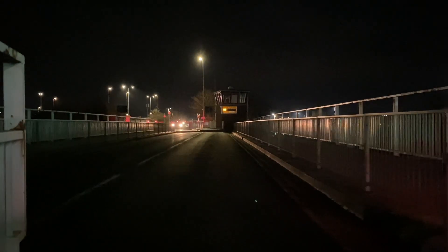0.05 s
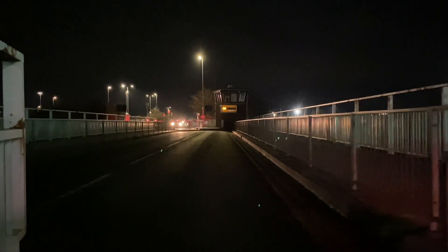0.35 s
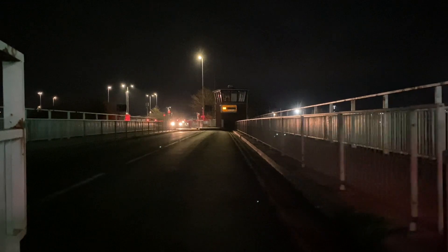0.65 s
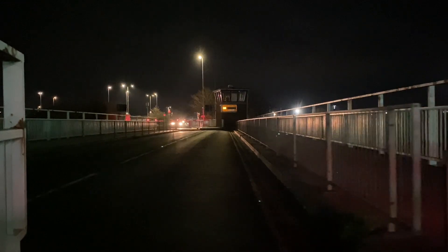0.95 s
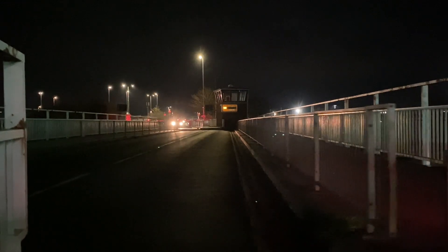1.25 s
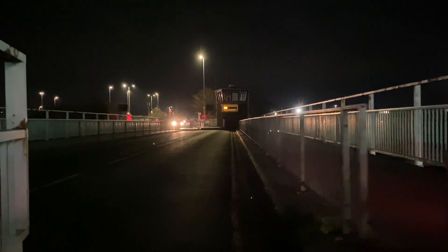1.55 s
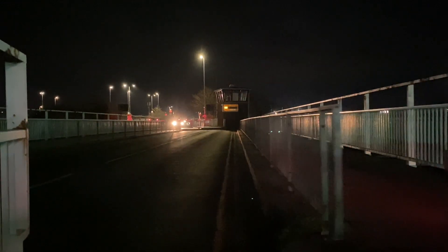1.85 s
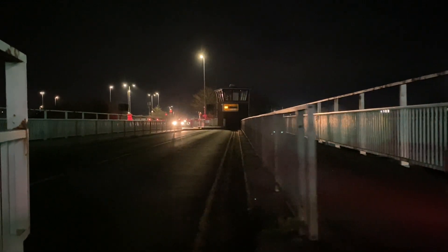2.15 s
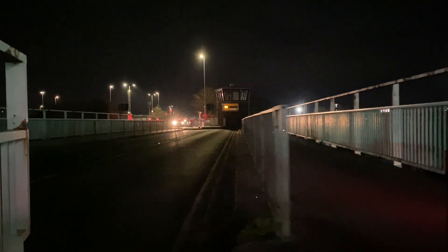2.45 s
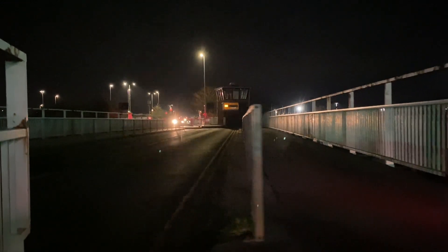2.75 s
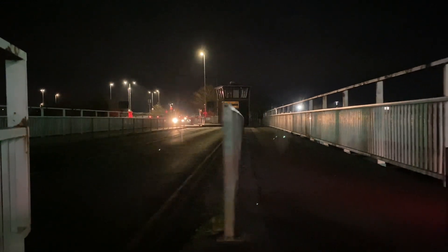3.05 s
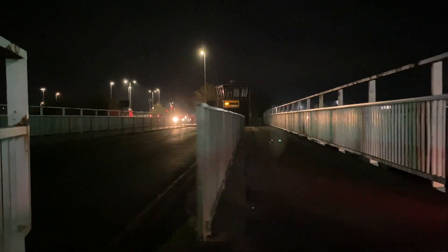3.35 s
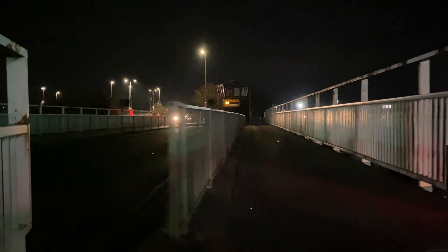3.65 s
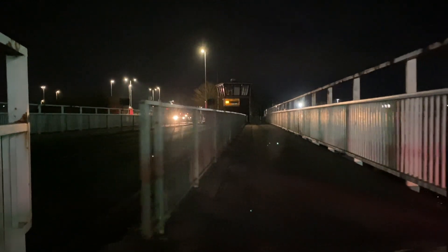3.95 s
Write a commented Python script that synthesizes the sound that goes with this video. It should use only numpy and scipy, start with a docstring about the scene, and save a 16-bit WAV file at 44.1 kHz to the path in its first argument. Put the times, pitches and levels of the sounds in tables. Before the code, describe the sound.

An engine runs low over a thudding rumble, whirring machinery and distant traffic. Metal rasps with a thin ring at 0.7 seconds, then the engine revs, peaking near 1.3 and sinking by 2.5. A second rasp at 2.8 precedes a louder rev that peaks around 3.4 and runs down. Small ticks gather from 3.6, with one dull knock close by at about 3.9 seconds.

```python
"""On a steel swing bridge at night, as it turns. An engine revs up twice and runs down, its exhaust
booming at multiples of the firing rate over a thudding rumble, humming and whirring gear and far traffic.
Metal rasps twice as quick slips excite its resonances, the first time with a thin ring, and friction
gives two faint squeaks. Small contacts tick, mostly towards the end, where one dull knock sounds
close to the microphone; both ring briefly in damped modes."""
import sys
import numpy as np
from scipy import signal
from scipy.io import wavfile

SR = 44100
rng = np.random.default_rng(int(sys.argv[2]) if len(sys.argv) > 2 else 0)


def digitize_waveform(pressure):
    """Quantize a signal to 16-bit integers and store it at the path in sys.argv[1].

    Rows of a 2-D input are taken as channels; values are limited to [-1, 1].
    """
    field = np.atleast_2d(pressure).T
    bounded = np.clip(field, -1, 1)
    quanta = np.round(bounded * 32767).astype(np.int16)
    wavfile.write(sys.argv[1], SR, quanta)


N = 176400
T = np.arange(N) / SR

# coherence of the noise at the two microphones: (frequency [Hz], correlation [-])
COHERENCE = [(30, 1), (70, 0.88), (160, 1), (350, 0.94), (700, 0.39), (1400, 0.1), (2800, 0.24),
             (5500, 0.18), (9000, 0.92)]

# engine speed through the two revs: (time [s], firing rate [Hz])
FIRING_RATE = [(0, 40.06), (.85, 41.87), (.95, 54.2), (1.03, 67.1), (1.12, 78.06), (1.25, 90.95),
               (1.45, 84.2), (1.62, 77.95), (1.8, 70.96), (2.1, 55.26), (2.45, 43.62), (2.9, 43.8),
               (3.02, 52.9), (3.12, 62.06), (3.2, 71.93), (3.33, 81.8), (3.43, 84.7), (3.58, 78.6),
               (3.8, 70.13), (4, 65.04)]
# exhaust fundamental: (time [s], level [dB])
BOOM_LEVEL = [(0, -59), (.95, -57.5), (1.08, -36.5), (1.17, -33.5), (1.3, -51.5), (1.47, -42), (1.66, -38),
              (1.81, -27.5), (1.88, -40), (2.15, -54.5), (3.05, -52.5), (3.17, -26), (3.33, -29),
              (3.53, -35.5), (3.72, -29.5), (3.8, -30.5), (4, -27.5)]
# third exhaust order: (time [s], level [dB])
THIRD_ORDER_LEVEL = [(0, -71), (.8, -69), (1.05, -52.5), (1.4, -60), (1.66, -50), (1.83, -53.5),
                     (1.94, -45.5), (2.05, -52), (2.2, -62), (2.86, -64), (3.03, -41.5), (3.25, -43),
                     (3.5, -54.5), (3.8, -55.5), (4, -40)]
# envelope of the orders around the octave, strongest under throttle: (time [s], level [dB])
OVERTONE_LEVEL = [(0, -70), (.8, -55.5), (1.03, -36.5), (1.19, -37), (1.32, -54), (1.53, -44.5),
                  (1.7, -44.5), (1.85, -49.5), (2.06, -44.5), (2.2, -55), (2.86, -51), (3.02, -32),
                  (3.17, -29), (3.28, -30), (3.42, -38), (3.549, -50), (3.8, -46), (4, -37.5)]
# orders under that envelope: (multiple of the firing rate [-], relative level [dB])
OVERTONES = [(1.5, -11), (2, -1), (2.5, -16)]

# rumble envelope: (time [s], level [dB])
RUMBLE_LEVEL = [(0, -48.5), (.22, -45), (.47, -44.5), (.56, -47), (.8, -47), (.92, -38.5), (1.14, -39.5),
                (1.32, -43.5), (1.6, -43.5), (1.87, -44), (1.97, -39.5), (2.06, -35), (2.16, -44),
                (2.38, -43), (2.56, -38), (2.68, -45), (2.88, -42), (3.04, -32), (3.2, -36), (3.5, -37),
                (4, -34.5)]
# rumble spectrum: (frequency [Hz], relative density [dB])
RUMBLE_SPECTRUM = [(20, -29), (33, -18.5), (48, -2.5), (72, 4.5), (98, -4.5), (125, -0.5), (165, -6),
                   (210, -5.5), (270, -19), (450, -33)]
# road and machinery envelope: (time [s], level [dB])
ROAR_LEVEL = [(0, -53), (.15, -53), (.3, -54), (.82, -52.5), (1.02, -47.5), (1.4, -48.5), (2.0, -50),
              (2.25, -52), (2.85, -51.5), (3.2, -46), (3.45, -47.5), (3.65, -48), (4, -48)]
# road and machinery spectrum: (frequency [Hz], relative density [dB])
ROAR_SPECTRUM = [(150, -3.5), (270, -4.5), (340, -3.5), (440, 2.5), (550, -7), (720, -4.5), (900, -11),
                 (1100, -17), (1350, -12), (1650, -22.5), (2100, -19.5), (2750, -29), (3500, -36),
                 (5000, -44.5), (7500, -46), (9200, -61.5), (12000, -44.5), (14000, -67)]
# tyre noise envelope: (time [s], level [dB])
HISS_LEVEL = [(0, -73.5), (.85, -77.5), (1.15, -68), (1.7, -69.5), (2.2, -72), (2.85, -76), (3.2, -76),
              (4, -74.5)]
# tyre noise spectrum: (frequency [Hz], relative density [dB])
HISS_SPECTRUM = [(1200, -1.5), (1800, 0.5), (2600, 3), (3300, -12.5), (4900, -17.5), (6200, -14.5),
                 (7800, -20.5), (9000, -34)]
# machinery tones: (frequency [Hz], level [dB])
HUM_TONES = [(115, -58), (195, -59.5), (315, -62), (774, -69.5)]
# resonances of the turning gear: (frequency [Hz], bandwidth [Hz], initial level [dB])
GEAR_MODES = [(647, 51, -57.5), (960, 82, -63.5), (1262, 41, -74.5)]

# light contacts: (time [s], ring gain [dB], crack gain [dB])
TICKS = [(.137, -37, -62), (2.572, -38.5, -58), (3.637, -30.5, -57), (3.665, -39.5, -62.5),
         (3.752, -29.5, -46), (3.841, -33, -56), (3.8898, -31.5, -48.5), (3.903, -34.5, -53.5),
         (3.9385, -28.5, -45.5), (3.9427, -18, -45), (3.9825, -28, -48)]
# their resonances: (frequency [Hz], relative level [dB], T60 [s])
TICK_MODES = [(429, -10.5, 0.03), (681, 0.5, .016), (860, -12, 0.013)]
# deep bumps in the rumble: (time [s], gain [dB])
THUDS = [(0.199, -34), (.363, -37.5), (.452, -35.5), (1.918, -28.5), (3.022, -23.5), (3.822, -19)]
# their resonances: (frequency [Hz], relative level [dB], T60 [s])
THUD_MODES = [(68, 1.5, .16), (114, -5, 0.05)]
# slips that make up the two rasps: (time [s], friction level [dB], ring gain [dB])
SLIPS = [(0.7283, -52.5, -55), (0.741, -54.5, -56), (2.8415, -54, -53), (2.849, -51.5, -55),
         (2.858, -56, -54)]
# friction spectrum: (frequency [Hz], relative density [dB])
RASP_SPECTRUM = [(700, -13), (1400, 2), (2700, -7.5), (3700, -17), (5300, -9), (8200, -12), (9500, -24.5),
                 (11500, -20.5), (14000, -38.5)]
# rubbed metal: (frequency [Hz], bandwidth [Hz], gain in first rasp [dB], gain in second rasp [dB])
METAL_MODES = [(1267, 90, -2.5, -6), (1484, 90, -7, -5), (1895, 120, -7, -6.5), (2670, 260, -23, -6.5),
               (3115, 130, -8.5, -17.5), (4040, 120, -17.5, -17), (5460, 320, -12.5, -15.5)]
# friction squeaks: (time [s], level [dB])
SQUEAKS = [(2.083, -79.5), (2.186, -73.5)]
# resonances of the close knock: (frequency [Hz], relative level [dB], T60 [s])
KNOCK_MODES = [(71.5, 4, 0.11), (126, -1.5, 0.06), (230, 0.5, 0.031), (334, -4, 0.021), (712, -3, 0.016)]

RUMBLE_LAG_S = .00029   # rumble and thuds reach the left microphone first
CUTOFF_HZ = 13700


def from_db(db):
    """Amplitude grows tenfold for every 20 dB."""
    return np.exp(np.asarray(db) * np.log(10) / 20)


def rms_one(x):
    """Normalisation to unit mean power."""
    return x / np.sqrt(np.mean(x ** 2) + 1e-20)


def in_time(curve):
    """Linear interpolation of a curve at every sample."""
    return np.interp(T, *np.transpose(curve))


def at_hz(spectrum, hz):
    """Interpolation on a logarithmic frequency axis."""
    frequencies, values = np.transpose(spectrum)
    return np.interp(np.log(hz), np.log(frequencies), values)


def drift(rate_hz):
    """Low-passed noise gives a slow random modulation of rms 1."""
    step, settle = 40, 2000   # samples per control point; control points for the filter to settle
    pole = np.exp(-2 * np.pi * rate_hz * step / SR)
    white = rng.standard_normal(N // step + settle + 2)
    slow = signal.lfilter([1], [1, -2 * pole, pole * pole], white)[settle:]
    return np.interp(np.arange(N) / step, np.arange(len(slow)), rms_one(slow))


def band(x, low_hz, high_hz, order=2):
    """Butterworth band-pass filtering."""
    return signal.sosfilt(signal.butter(order, [low_hz, high_hz], "band", fs=SR, output="sos"), x)


def resonance(hz, width_hz, shape=N):
    """A randomly driven resonance yields narrow-band noise; rms 1."""
    return rms_one(band(rng.standard_normal(shape), hz - width_hz / 2, hz + width_hz / 2))


def pan(db):
    """Direction by level difference: positive favours the left."""
    return from_db(np.array([[db], [-db]]) / 2)


def lagged(x, lag_s):
    """Direction by arrival time: a positive lag delays the right channel, a negative one advances it."""
    left, right = np.broadcast_to(x, (2, N))
    return np.array([left, np.interp(T - lag_s, T, right)])


def noise(spectrum, flicker_db, flicker_hz):
    """Partly coherent stereo noise in independently modulated third-octave bands; rms 1."""
    edges = 22 * 2 ** (np.arange(29) / 3)
    out, white = 0, rng.standard_normal((2, 2, N + SR // 2))
    for k, (low, high) in enumerate(zip(edges, edges[1:])):
        if high < spectrum[0][0] or low > spectrum[-1][0]:
            continue
        mid, side = band(white[k % 2], low, high, order=3)[:, -N:]
        hz = np.sqrt(low * high)
        alike = at_hz(COHERENCE, hz)
        gain = from_db(at_hz(spectrum, hz) + flicker_db * drift(flicker_hz))
        out = out + gain * (np.sqrt(1 + alike) * mid + np.sqrt(1 - alike) * side * [[1], [-1]])
    return rms_one(out)


def decay(start_s, t60_s):
    """Exponential damping: a fall of 60 dB in each T60."""
    return (T >= start_s) * from_db(-60 * np.maximum(T - start_s, 0) / t60_s)


def swell(peak_s, rise_s, fall_s):
    """Exponential growth to a peak, then exponential decay."""
    return np.exp(np.minimum(T - peak_s, 0) / rise_s - np.maximum(T - peak_s, 0) / fall_s)


def power_sum(envelopes):
    """Incoherent sounds add in power."""
    return np.linalg.norm(envelopes, axis=0)


def struck(start_s, modes):
    """Free vibration after an impact is a sum of damped sinusoids."""
    out, ringing = np.zeros(N), (T >= start_s) & (T < start_s + .5)
    age = T[ringing] - start_s
    for hz, db, t60_s in modes:
        out[ringing] += from_db(db - 60 * age / t60_s) * np.sin(2 * np.pi * hz * age)
    return out


def engine(jitter=.01, flutter_db=1.5):
    """Periodic firing radiates exhaust orders whose pitch rises and falls with engine speed."""
    firing_hz = in_time(FIRING_RATE) * (1 + jitter * drift(15.7))
    phase = 2 * np.pi * np.cumsum(firing_hz) / SR
    orders = [(1, in_time(BOOM_LEVEL)), (3, in_time(THIRD_ORDER_LEVEL))]
    orders += [(order, in_time(OVERTONE_LEVEL) + db) for order, db in OVERTONES]
    exhaust = 0
    for order, db in orders:
        amplitude = np.sqrt(2) * from_db(db + flutter_db * drift(9.6))
        exhaust += amplitude * np.sin(order * phase + 2 * np.pi * rng.random())
    return lagged(exhaust, .00028)


def rumble():
    """Amplitude modulation makes low noise throb; it swells as the engine pulls."""
    envelope = from_db(in_time(RUMBLE_LEVEL) + 1.4 * drift(7.4))
    return lagged(envelope * noise(RUMBLE_SPECTRUM, flicker_db=2.5, flicker_hz=9), RUMBLE_LAG_S)


def roar():
    """Traffic and machinery superpose into a wide wash of broadband noise."""
    envelope = from_db(in_time(ROAR_LEVEL))
    return pan(db=1) * envelope * noise(ROAR_SPECTRUM, flicker_db=1.94, flicker_hz=14)


def tyre_hiss():
    """Rolling noise from far tyres arrives as a faint hiss."""
    return from_db(in_time(HISS_LEVEL)) * noise(HISS_SPECTRUM, flicker_db=1.5, flicker_hz=12)


def machine_hum(waver_db=3.5, wander=.00765):
    """Periodic machine vibration gives faint tones, modulated in level and frequency."""
    out = 0
    for hz, db in HUM_TONES:
        amplitude = np.sqrt(2) * from_db(db + waver_db * drift(4))
        phase = 2 * np.pi * hz * np.cumsum(1 + wander * drift(10.3)) / SR
        out += amplitude * np.sin(phase)
    return out


def gear_whir(fade_db_per_s=3):
    """Random excitation of the turning gear's resonances gives a rough whir, slowly receding."""
    whir = sum(from_db(db) * resonance(hz, width, (2, N)) for hz, width, db in GEAR_MODES)
    return whir * from_db(-fade_db_per_s * T)


def ticks(crack_band_hz=(1290, 3020), crack_t60_s=.012):
    """Light impacts radiate a broad, dull crack and a short, hollow modal ring."""
    white = rng.standard_normal(N)
    white /= np.std(band(white, *crack_band_hz, order=3))   # unit power within the band
    bursts = white * sum(from_db(db) * decay(s, crack_t60_s) for s, _, db in TICKS)
    cracks = band(bursts, *crack_band_hz, order=3)
    cracks = band(cracks, 500, 5500, order=4)   # steeper skirts
    rings = sum(from_db(db) * struck(s, TICK_MODES) for s, db, _ in TICKS)
    return cracks + lagged(band(rings, 130, 1060, order=3), -.00026)


def thuds():
    """Soft impacts excite only low modes."""
    bumps = sum(from_db(db) * struck(s, THUD_MODES) for s, db in THUDS)
    return lagged(band(bumps, 40, 250), RUMBLE_LAG_S)


def rasps(rise_s=.0079, friction_fall_s=.0049, ring_fall_s=.016, tail_db=-16, tail_t60_s=.42):
    """Stick-slip friction spits bright noise and rings the metal, leaving a diffuse outdoor tail."""
    friction = noise(RASP_SPECTRUM, flicker_db=4, flicker_hz=60)
    rings = [resonance(hz, width) for hz, width, *_ in METAL_MODES]
    echoes = [resonance(hz, 2 * width, (2, N)) for hz, width, *_ in METAL_MODES]
    _, _, first_db, second_db = np.transpose(METAL_MODES)
    out = 0
    for slips, modes_db in (SLIPS[:2], first_db), (SLIPS[2:], second_db):
        rub = power_sum([from_db(db) * swell(s, rise_s, friction_fall_s) for s, db, _ in slips])
        ringing = power_sum([from_db(db) * swell(s, rise_s, ring_fall_s) for s, _, db in slips])
        tail = power_sum([from_db(db + tail_db) * decay(s, tail_t60_s) for s, db, _ in slips])
        out += np.hypot(rub, tail) * friction
        for db, ring, echo in zip(modes_db, rings, echoes):
            out += from_db(db) * (ringing * ring + tail * echo)
    return out


def steel_ring(peak_s=.737, hz=4690, gain_db=-48.5, rise_s=.0055, tail_db=-17):
    """Resonance: the first rasp drives one high steel mode, which decays into a diffuse tail."""
    build_up = np.exp(np.minimum(T - peak_s, 0) / rise_s)
    envelope = np.where(T < peak_s, build_up, decay(peak_s, t60_s=.094))
    direct = pan(db=2.5) * lagged(envelope * np.sin(2 * np.pi * hz * T), .00005)
    tail = from_db(tail_db) * decay(peak_s, t60_s=.36) * resonance(hz, width_hz=160, shape=(2, N))
    return from_db(gain_db) * (direct + tail)


def squeaks():
    """Friction briefly excites a high, narrow resonance."""
    envelope = sum(from_db(db) * swell(s, rise_s=.012, fall_s=.012) for s, db in SQUEAKS)
    return envelope * resonance(hz=7457, width_hz=570)


def knock(start_s=3.9448, gain_db=-15.5):
    """A soft, heavy impact close by puts its energy into low, quickly damped modes."""
    bump = band(struck(start_s, KNOCK_MODES), 42, 835, order=3)
    return lagged(from_db(gain_db) * bump, -.00042)


def scene():
    """Superposition: the pressures of all sources add at the microphones."""
    steady = engine() + rumble() + roar() + tyre_hiss() + machine_hum() + gear_whir()
    return steady + ticks() + thuds() + rasps() + steel_ring() + squeaks() + knock()


def record(dry):
    """Band limiting: a steep low-pass removes the highest treble."""
    return signal.sosfilt(signal.cheby2(12, 70, CUTOFF_HZ, fs=SR, output="sos"), dry)


dry = scene()
out = record(dry)
digitize_waveform(out)
```